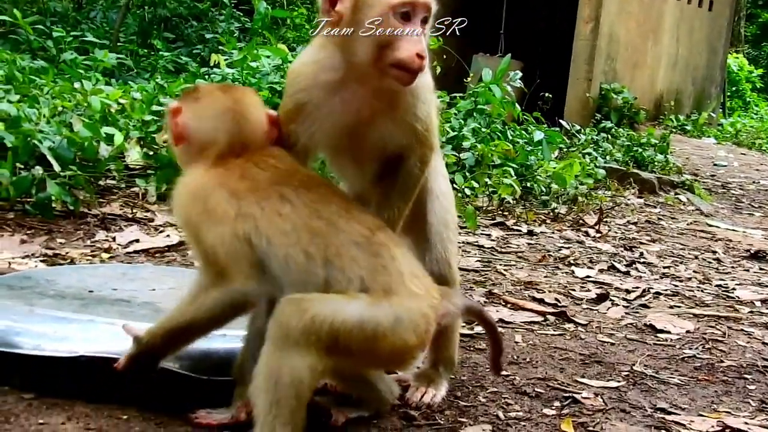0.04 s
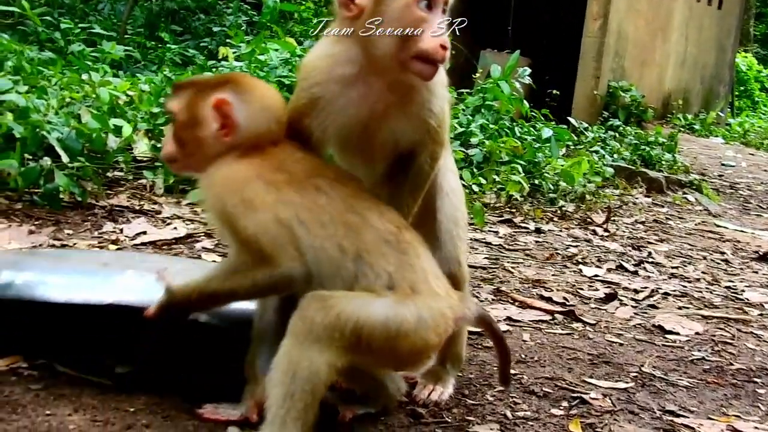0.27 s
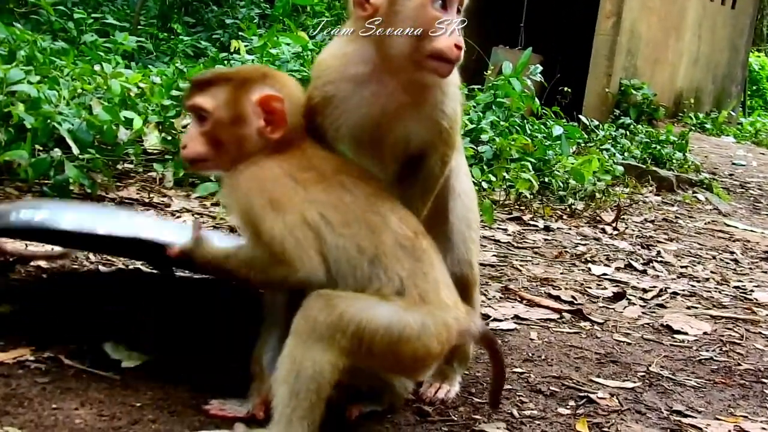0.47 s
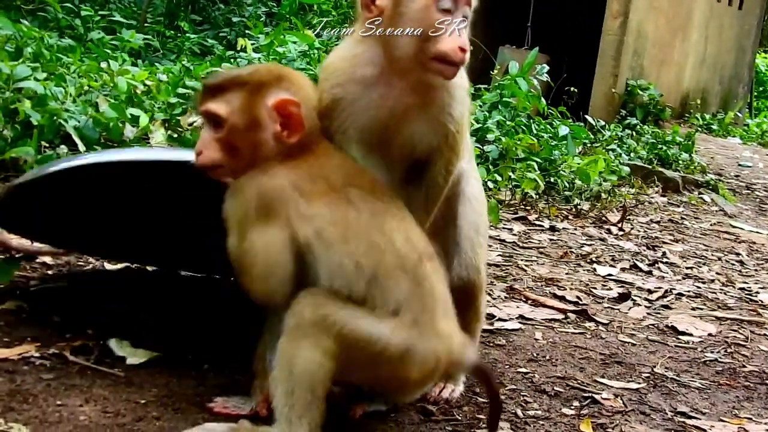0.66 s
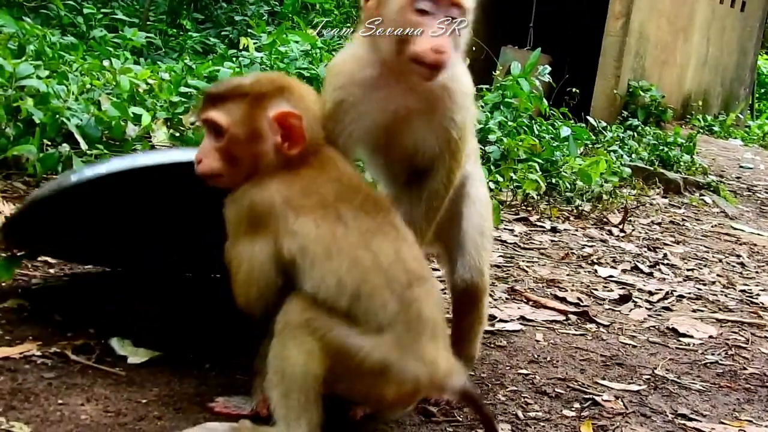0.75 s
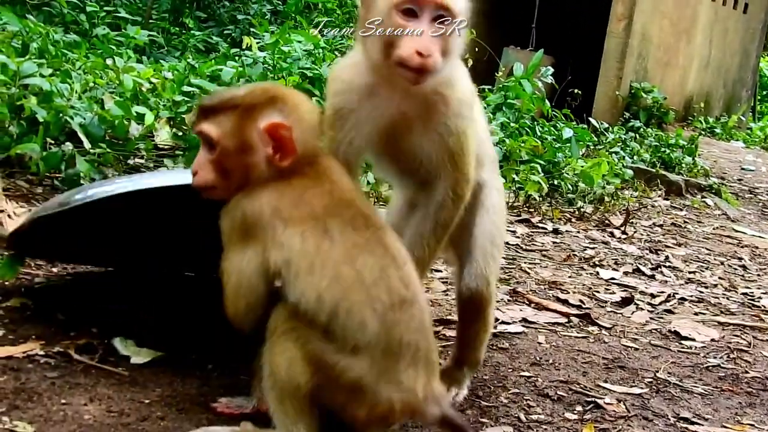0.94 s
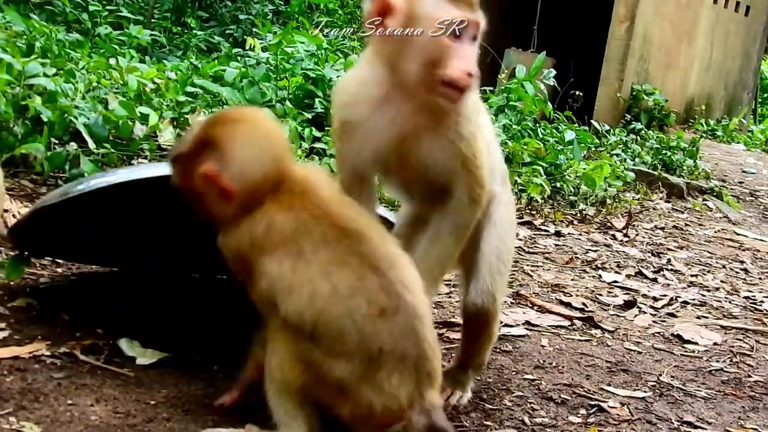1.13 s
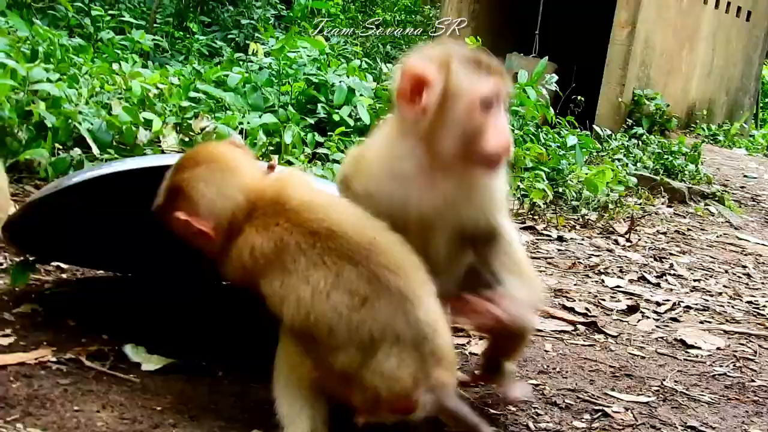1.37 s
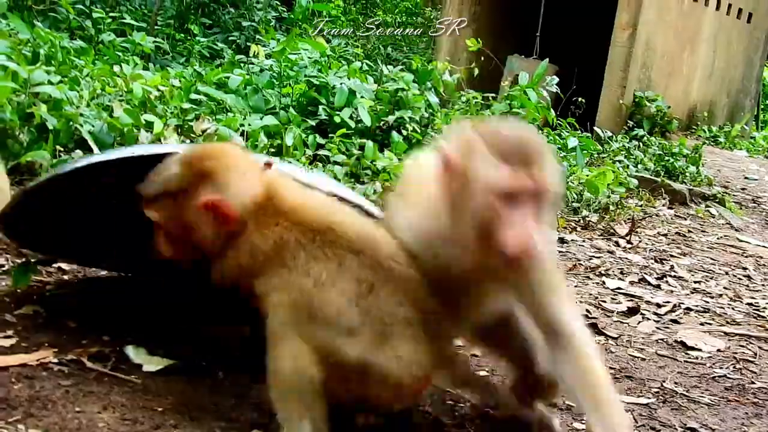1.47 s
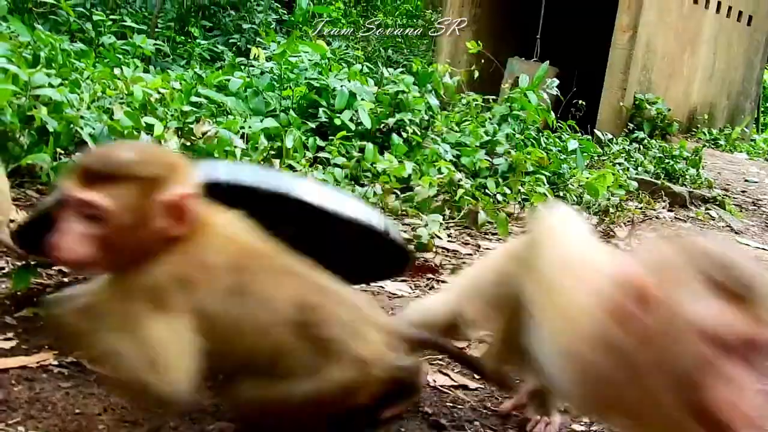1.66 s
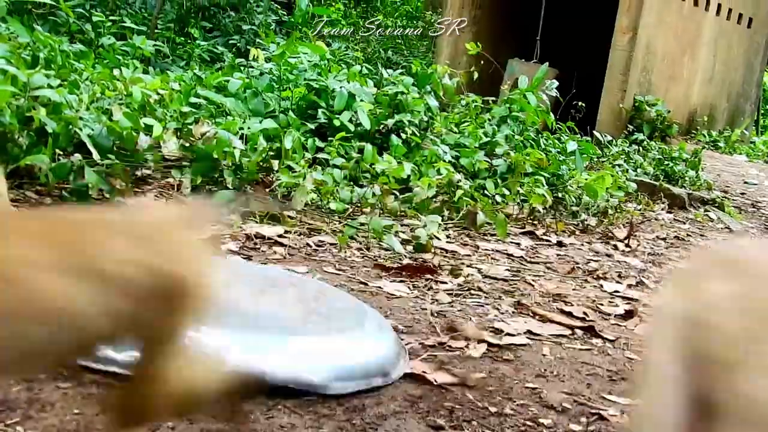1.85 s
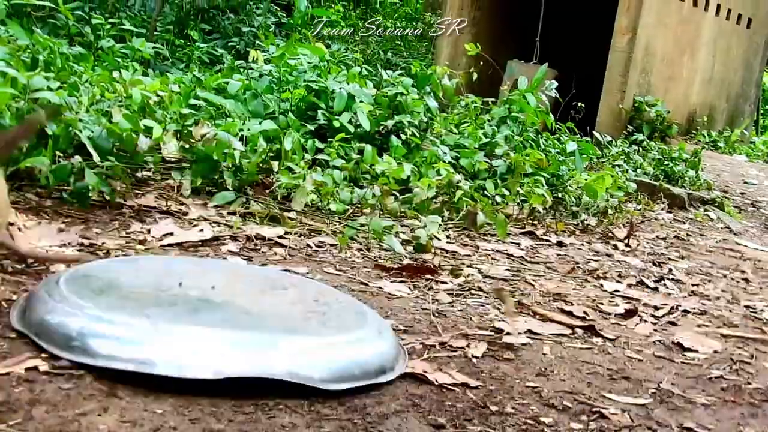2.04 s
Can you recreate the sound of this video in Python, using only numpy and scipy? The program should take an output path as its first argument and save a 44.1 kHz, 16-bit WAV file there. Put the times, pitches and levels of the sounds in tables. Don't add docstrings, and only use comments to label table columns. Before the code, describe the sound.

A thin metal tray knocks and scrapes softly, then drops flat with a loud ringing crash

```python
import sys
import numpy as np
from scipy import signal
from scipy.io import wavfile
from scipy.ndimage import uniform_filter1d, map_coordinates

SR = 44100
rng = np.random.default_rng(int(sys.argv[2]) if len(sys.argv) > 2 else 0)


def nominal_scale(level):
    x = np.asarray(level, float) / 20
    return 10 ** x


def unload_wav(signal):
    wavfile.write(
        sys.argv[1],
        SR,
        np.round(np.clip(np.atleast_2d(signal).T, -1, 1) * 32767).astype(np.int16),
    )


N = 92962
T = np.arange(N) / SR
FALL_S = 1.8953

# start_s [s], ring_db [dB], thud_db [dB], crack_db [dB], ring_centre_hz [Hz]
TRAY_KNOCKS = [(.006, -32.5, -53.5, -37.5, 1600), (0.138, -34.5, -39.5, -49.5, 900),
               (0.17, -38, -39.5, -44, 1720), (.185, -39, -40.5, -39.5, 1100),
               (0.198, -31, -38.5, -28, 1097), (0.204, -32.5, -64, -52, 1780),
               (.37, -25.5, -29.5, -34, 2165), (0.661, -49, -42, -62, 720), (0.708, -50, -38.5, -53.5, 754),
               (0.795, -57, -52, -78, 810), (1.119, -76, -50, -78, 800), (1.564, -72, -42.5, -76, 850),
               (1.665, -45, -52, -47, 1100), (1.703, -41.5, -49.5, -34.5, 1180),
               (1.716, -35.5, -59, -49, 2200), (1.802, -39.5, -69, -37, 1190), (1.819, -35, -51, -50, 1100),
               (1.848, -42.5, -64, -43.5, 1300), (1.896, -72.5, -53.5, -36, 607),
               (1.9143, -10.5, -56.5, -34.5, 1470), (1.9256, -9.5, -67, -32.5, 1360),
               (1.9595, -11, -76, -28, 1376), (2.016, -10.5, -61.5, -25, 1100)]


def level(x, db):
    return x * nominal_scale(db) / np.sqrt(np.mean(x ** 2))


def curve(rows, column=-1):
    rows = np.array(rows, float)
    return np.interp(T, rows[:, 0], rows[:, column])


def colour(rows, hz):
    table_hz, table_db = np.transpose(rows)
    return np.interp(np.log(hz), np.log(table_hz), table_db)


def mode(x, hz, t60):
    pole = np.exp((2j * np.pi * hz - np.log(1000) / t60) / SR)
    return signal.lfilter([1], [1, -pole], x).imag


def band(x, hz, width):
    return signal.lfilter(*signal.iirpeak(hz, hz / width, fs=SR), x)


def highpass(x, order, hz):
    return signal.sosfilt(signal.butter(order, hz, "high", fs=SR, output="sos"), x)


def noise():
    return rng.standard_normal(N)


def walk(rate_hz):
    hold = int(SR / rate_hz)
    steps = np.repeat(rng.standard_normal(N // hold + 1), hold)
    return uniform_filter1d(uniform_filter1d(steps, hold), hold)[:N]


def clicks(rows, column):
    x = np.zeros(N)
    for row in rows:
        x[int(row[0] * SR)] = nominal_scale(row[column])
    return x


def grit(spread_db):
    grain = np.minimum(rng.exponential(size=N), 5)
    return level(noise() * nominal_scale(spread_db * grain), 0)


def plate_modes():
    # pitch_hz [Hz], level_db [dB], swell_s [s after the fall]
    main_modes = [(492, -12.5, .19), (678.3, -10, .04), (792, -6, .09), (898, -12, 0.089),
                  (1100, -9.5, 0.11), (1238, -5.5, .19), (1270, -2, .1), (1379, 2, .185),
                  (1450, 0.5, 0.064), (1610, -10.5, 0.14), (2205, -7, 0.032), (2456, -8, .06),
                  (3130, -10, 0.11), (4710, -9, .11)]
    # pitch_hz [Hz], level_db [dB]
    plate_colour = [(220, -24), (750, -14), (1080, -8.5), (1400, -1.5), (1950, -8.5), (2600, -7),
                    (5200, -14), (6500, -36)]
    main_hz, main_db, main_swell_s = np.transpose(main_modes)
    dense_hz = 220 * (6500 / 220) ** (np.linspace(0, 1, num=326) ** .62)
    dense_hz = dense_hz * (1 + 0.004256 * rng.standard_normal(326))
    dense_db = colour(plate_colour, dense_hz) + 2 * rng.standard_normal(326)
    hz = np.append(main_hz, dense_hz)
    gain = nominal_scale(np.append(main_db + 4, dense_db))
    swell_s = np.append(main_swell_s, np.full(326, np.inf))
    return hz, gain, swell_s


def tray_push():
    # start_s [s], level_db [dB]
    rim_scrape = [(0.0, -26), (0.014, -57), (0.03, -38.5), (0.116, -35), (0.21, -26), (0.358, -39.5),
                  (0.374, -49), (0.422, -35.5), (0.61, -49), (1.208, -54.5), (1.37, -43.5), (1.602, -45.5),
                  (1.724, -33.5), (1.776, -36.5), (1.82, -24.5), (1.895, -61)]
    push = grit(0.55) * nominal_scale(curve(rim_scrape) - 59.5) * (T < FALL_S)
    u = T[:900]
    for start_s, ring_db, _, _, hz in TRAY_KNOCKS:
        i = int(start_s * SR)
        pulse = np.exp(-u * hz * 0.7) * np.sin(2 * np.pi * hz * u)
        push[i:i + 900] += pulse * nominal_scale(ring_db - 43.5)
    return push


def held_tray(push, modes):
    # pitch_hz [Hz], level_db [dB], t60_s [s]
    held_modes = [(867, 1, .25), (931, 3, .25), (1020, 3, .25), (1093, 6, .4), (1235, 7, .3), (1290, 6, .3),
                  (1351, 8, .3), (1400, 7, .4), (1485, 8, .4), (1650, 3, .18), (1836, 3, .25),
                  (1900, -1, .2), (2200, 0, .2), (2480, -2, .2)]
    grip_db, waver_s = 3, .00026
    held = 0
    for hz, db, t60 in held_modes:
        held = held + nominal_scale(db) * mode(push * nominal_scale(grip_db * walk(8.88)), hz, t60)
    held = map_coordinates(held, [(T + waver_s * walk(24.99)) * SR], mode="mirror")
    u, ring = T[:16000], 0
    for hz, gain, _ in zip(*modes):
        t60 = 0.27 * (1000 / hz) ** 0.068
        strength = gain ** .4 * min(hz / 800, 1) ** 2
        shape = nominal_scale(-60 * u / t60) * np.minimum(u / 0.0004, 1)
        ring = ring + strength * shape * np.sin(2 * np.pi * (hz * u + rng.standard_normal()))
    return held + signal.fftconvolve(push, ring * nominal_scale(-4))[:N]


def crash(modes):
    climb_s, rise_s, wave_s, wobble_s = .012, .003, 0.012, .028
    swell_db, swell_width_s, wobble_db, t60_s = 8.5, 0.025, 4, 5.7
    out, start = np.zeros(N), int(FALL_S * SR)
    u = T[start:] - FALL_S
    for i, (hz, gain, swell_s) in enumerate(zip(*modes)):
        khz, phase = hz / 1000, rng.standard_normal()
        late = np.clip(u - climb_s * khz ** .6, 0, None)
        rise = 1 - np.exp(-late / (rise_s + .0015 * khz ** 2 / 2))
        first_wave = 1.5 * khz ** -1.73 * np.exp(-late / wave_s)
        fed = rise * (nominal_scale(-60 * late / t60_s) + first_wave)
        wobble = rng.standard_normal(40) * (.5 if i < 14 else 1)
        trade_db = wobble_db * np.interp(u / wobble_s + phase % 1, np.arange(40), wobble)
        trade_db = trade_db + swell_db * np.exp(-((u - swell_s) / swell_width_s) ** 2)
        out[start:] += gain * fed * nominal_scale(trade_db) * np.sin(2 * np.pi * (hz * u + phase))
    return out * nominal_scale(-28 + 1.1 * walk(250))


def rim_slams():
    # start_s [s], pitch_hz [Hz], level_db [dB], t60_s [s]
    slams = [
        (1.9146, 1510, -7.5, 0.026),
        (1.9246, 1424, -11.5, 0.024),
        (1.9597, 1410, -8.5, .03),
        (2.017, 1000, -10, .04),
        (2.018, 2300, -15, .02),
        (2.051, 1350, -12, .03),
    ]
    out = np.zeros(N)
    for start_s, hz, db, t60 in slams:
        u = np.clip(T - start_s, 0, None)
        out = out + nominal_scale(db - 60 * u / t60) * np.sin(2 * np.pi * hz * u)
    return out


def tray():
    modes = plate_modes()
    return held_tray(tray_push(), modes) + crash(modes) + rim_slams()


def thuds():
    # start_s [s], level_db [dB]
    soil_rock = [(0.0, -39.5), (0.084, -92), (0.194, -38), (0.252, -51.5), (0.352, -50), (0.368, -42),
                 (0.546, -49), (0.668, -42.5), (1.11, -50.5), (1.12, -51.5), (1.504, -50), (1.52, -84),
                 (1.578, -45), (1.62, -58), (1.868, -73), (1.894, -53)]
    # pitch_hz [Hz], level_db [dB], t60_s [s]
    low_modes = [(145.3, -6, 0.063), (190.5, 0, 0.093), (243.6, -7, 0.086), (372.5, -2, 0.046),
                 (442.8, -12, 0.18)]
    rock_db = np.where(T < FALL_S, curve(soil_rock), -36.5)
    push = clicks(TRAY_KNOCKS, 2) + grit(4.7) * nominal_scale(rock_db - 27.5)
    return highpass(sum(nominal_scale(db) * mode(push, hz, t60) for hz, db, t60 in low_modes), 2, 110)


def cracks():
    u = T[:4000]
    tail = np.exp(-u / 0.012) + 0.089 * np.exp(-u / 0.098)
    bursts = noise() * signal.fftconvolve(clicks(TRAY_KNOCKS, 3), tail)[:N]
    return band(bursts, 4370, 3000) * 3.95


def leaves():
    # start_s [s], level_db [dB]
    leaf_rustle = [(0, -48.5), (.15, -56), (.2, -49), (.3, -49.5), (.45, -58.5), (.78, -58.5), (.82, -54),
                   (.93, -61), (1.0, -51.5), (1.05, -61.5), (1.27, -61.5), (1.32, -48.5), (1.42, -56.5),
                   (1.49, -46), (1.6, -49.5), (1.795, -51), (1.803, -45), (1.9, -44)]
    grains = grit(4.7)
    bright = band(band(grains, 5900, 4800), 4300, 2200) * 4.38
    body = 0.068 * band(grains, 3400, 1200)
    return (bright + body) * nominal_scale(curve(leaf_rustle) + 2 + 0.43 * walk(19.0)) * (T < FALL_S + .01)


def air():
    # pitch_hz [Hz], level_db [dB per Hz]
    air_colour = [(18, -34), (30, 15.5), (163, 4), (213, -10.5), (261, -29), (439, -12.5), (1330, -25),
                  (4790, -24), (6570, -21), (8540, -70), (14500, -120)]
    out, left_right = 0, np.array([[1], [-1]])
    for hz in 32 * 2 ** np.arange(0, 7.8, .5):
        db = colour(air_colour, hz) + 10 * np.log10(hz) / 2 + 3.6 * walk(15)
        width = min(0.062 + hz / 3600.0, 1)
        mid, side = band(noise(), hz, hz / 3), band(noise(), hz, hz / 3)
        out = out + nominal_scale(db) * (mid + width * side * left_right)
    return level(out, -48)


def insects():
    def chorus(hz):
        flutter_db = 2.0 * walk(30.34) + 0.5 * walk(11)
        return band(band(noise(), hz, 530), hz, 530) * nominal_scale(flutter_db)

    out, left_right = 0, np.array([[1], [-1]])
    for hz, db in ((4833, -49.5), (3880, -60.5)):
        out = out + level(chorus(hz) + 0.97 * chorus(hz) * left_right, db)
    return out


def pings():
    # start_s [s], pitch_hz [Hz], level_db [dB], t60_s [s]
    rim_pings = [(.17, 365, -38, .15), (.41, 175, -36, .15), (.585, 950, -52, .15), (.68, 390, -45, .1),
                 (.872, 835, -45, .14), (.962, 480, -39, .1), (1.015, 230, -47, .1), (1.245, 500, -44, .1),
                 (1.34, 860, -49, .2), (1.6, 840, -49, .2), (2.085, 480, -30, .2)]
    out = np.zeros(N)
    for start_s, hz, db, t60 in rim_pings:
        u = np.clip(T - start_s, 0, None)
        attack = 1 - np.exp(-u / .006)
        out = out + nominal_scale(db - 60 * u / t60) * attack * np.sin(2 * np.pi * hz * u)
    return out


def squeak():
    # start_s [s], pitch_hz [Hz], level_db [dB]
    call = [
        (1.34, 1400, -72),
        (1.38, 1680, -59),
        (1.41, 1850, -62),
        (1.435, 2180, -60),
        (1.47, 2230, -61),
        (1.5, 2300, -59),
        (1.53, 2300, -74),
    ]
    hz = curve(call, column=1) * (1 + .05 * walk(110))
    sounding = (T > call[0][0]) * (T < call[-1][0])
    return nominal_scale(curve(call) + 3 + 4.5 * walk(80)) * sounding * np.sin(2 * np.pi * np.cumsum(hz) / SR)


def air_slap():
    u = np.clip(T - 1.8958, 0, None)
    turn = 2 * np.pi * 200.8 * (u + 6 * np.minimum(u, .03) ** 2)
    hold_s, fade_s = 0.0087, 0.012
    fade = np.exp(-u / 0.051 - np.clip(u - hold_s, 0, None) / fade_s)
    slap = np.clip(u / 0.0017, 0, 1) * fade * np.tanh(1.93 * np.sin(turn))
    return -nominal_scale(-6.5) * highpass(slap, 2, 70)


def ticks():
    # start_s [s], level_db [dB]
    rim_ticks = [
        (1.895, -1.5),
        (1.915, 3),
        (1.927, -3),
        (1.961, 4),
        (2.028, -12),
    ]
    hits = clicks(rim_ticks, 1) * nominal_scale(-42)
    return noise() * signal.fftconvolve(hits, np.exp(-T[:400] / 0.0017))[:N]


def scene():
    near = tray() + thuds() + cracks() + leaves() + pings() + squeak() + air_slap()
    echo_db, echo_t60_s = -7, 0.078
    tails = rng.standard_normal((2, 9000)) * nominal_scale(-60 * T[:9000] / echo_t60_s)
    tails = tails / np.sqrt(np.sum(tails[0] ** 2))
    high = near - uniform_filter1d(near, size=40)
    echo = signal.fftconvolve(high[None], tails, axes=1)[:, :N] * nominal_scale(echo_db)
    shade = band(near, 1300, 1300) * 0.26 / 2
    return np.array([near * nominal_scale(0.7) - shade, near + shade]) + echo + air() + insects()


def roll_off(x):
    return signal.sosfilt(signal.butter(12, 15800, fs=SR, output="sos"), x)


def record(dry):
    dull = signal.sosfilt(signal.butter(4, 4586, fs=SR, output="sos"), dry)
    x = dull + nominal_scale(-53) * dry + band(ticks(), 9000, 9000)
    x = highpass(x, 3, 42)
    loudness = signal.lfilter([.002], [1, -.998], np.mean(x ** 2, axis=0)) ** .5
    duck_top_db, duck_power = -36, .42
    x = x * np.minimum(1, nominal_scale(duck_top_db) / (loudness + 1e-9)) ** duck_power
    fizz = nominal_scale(-59) * loudness * np.clip(loudness * 15, 0, 1) * rng.standard_normal(x.shape)
    x = np.tanh(1.2 * x) / 1.2 + fizz
    x = x + nominal_scale(-67.5) * band(rng.standard_normal(x.shape), 5000, 3600)
    stop_s = .004
    x = x * np.clip((T[-1] - T) / stop_s, 0, 1)
    return roll_off(x)


dry = scene()
out = record(dry)
unload_wav(out)
```